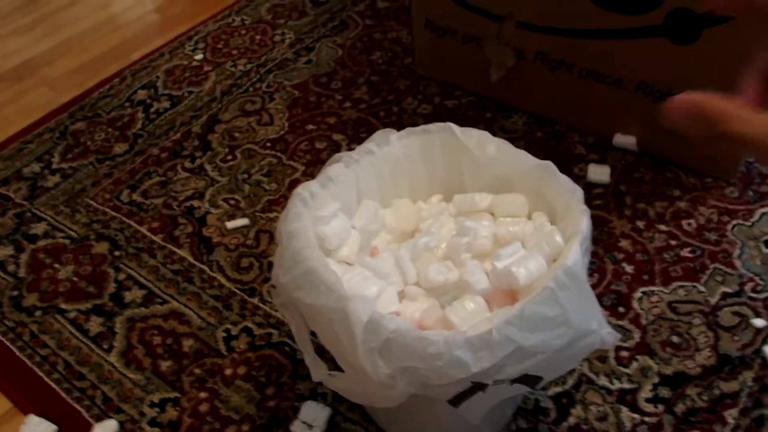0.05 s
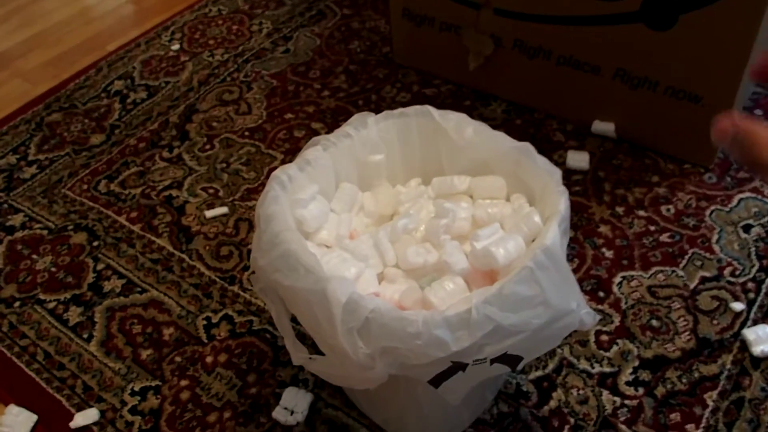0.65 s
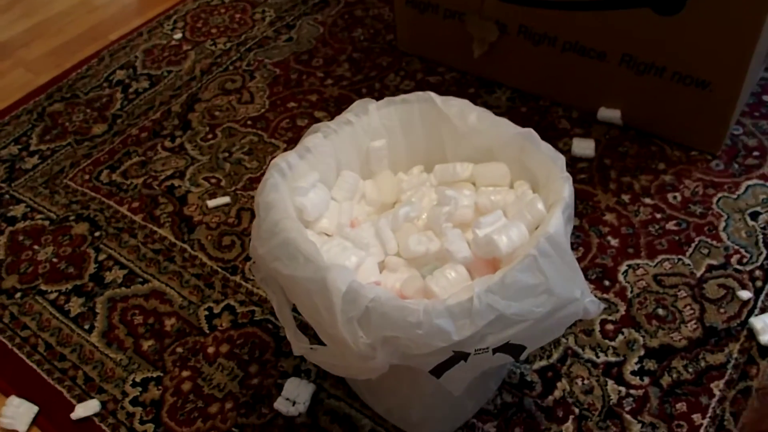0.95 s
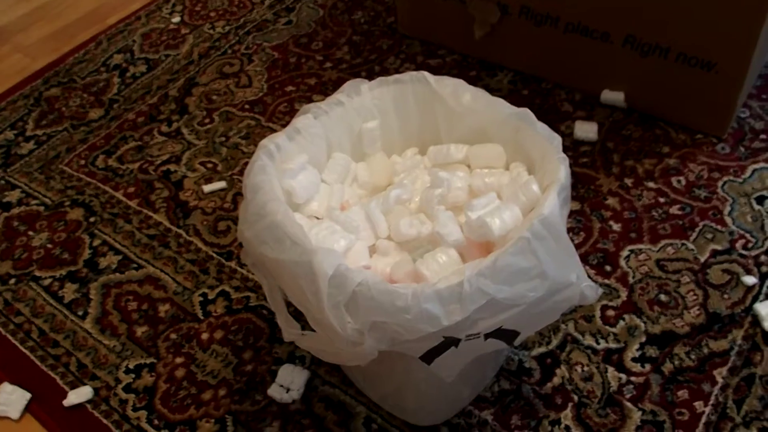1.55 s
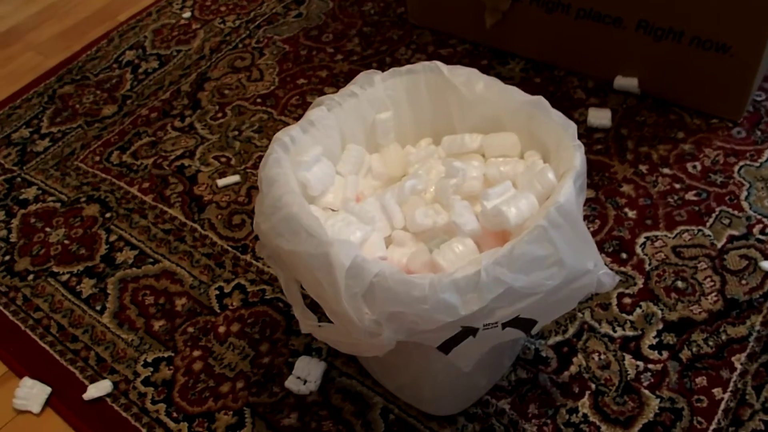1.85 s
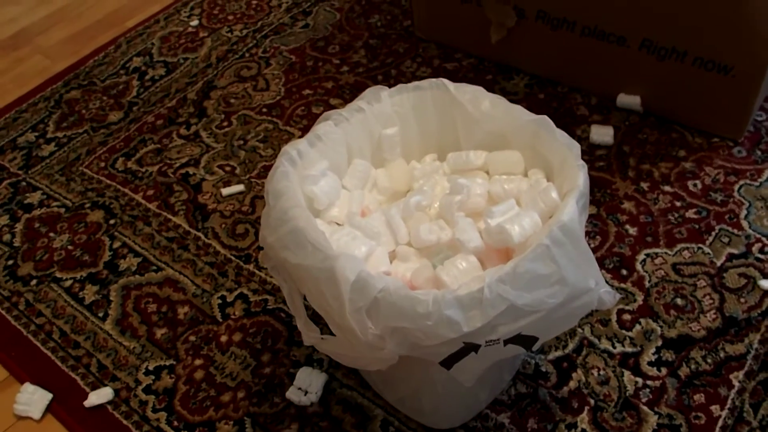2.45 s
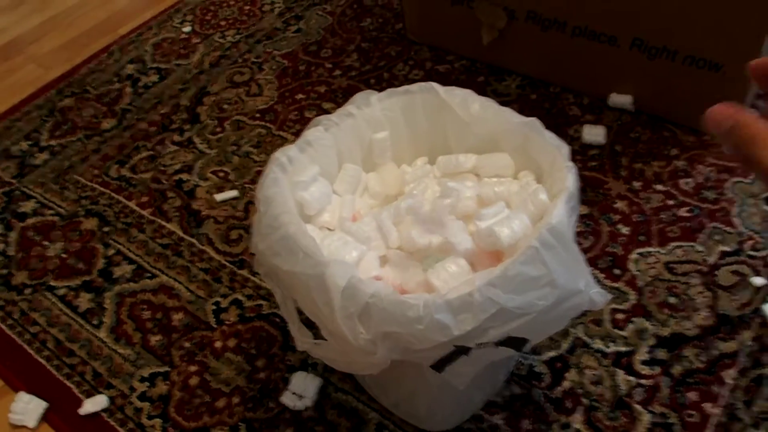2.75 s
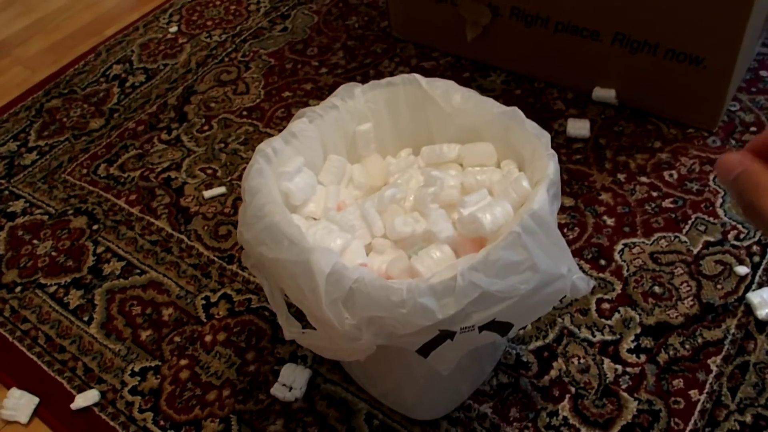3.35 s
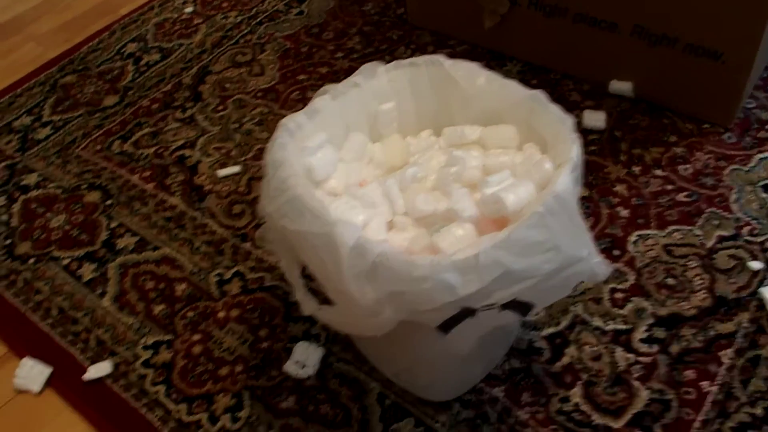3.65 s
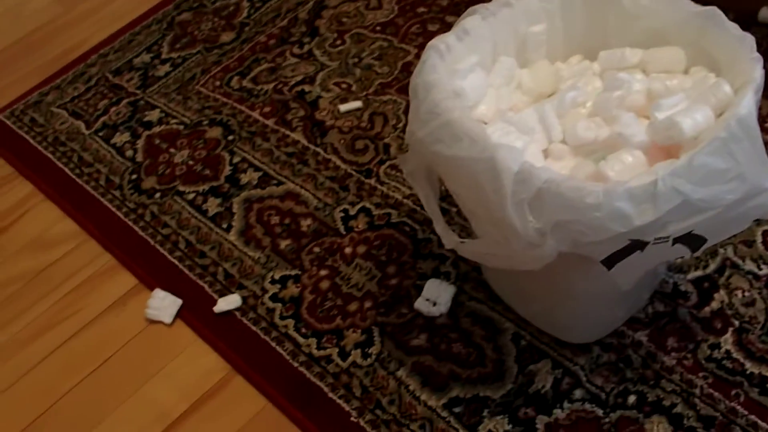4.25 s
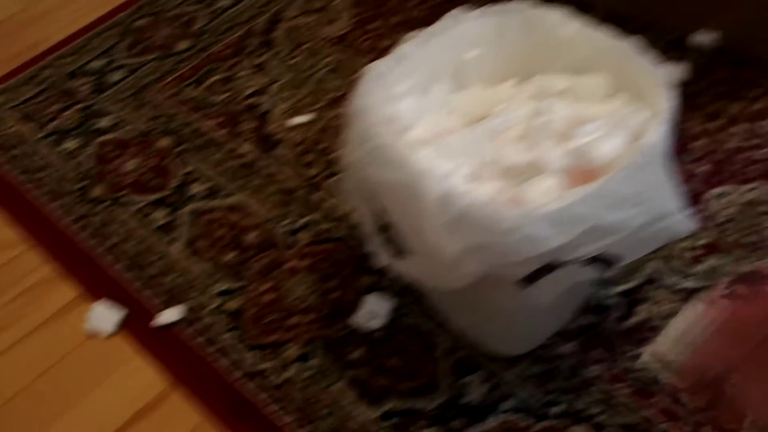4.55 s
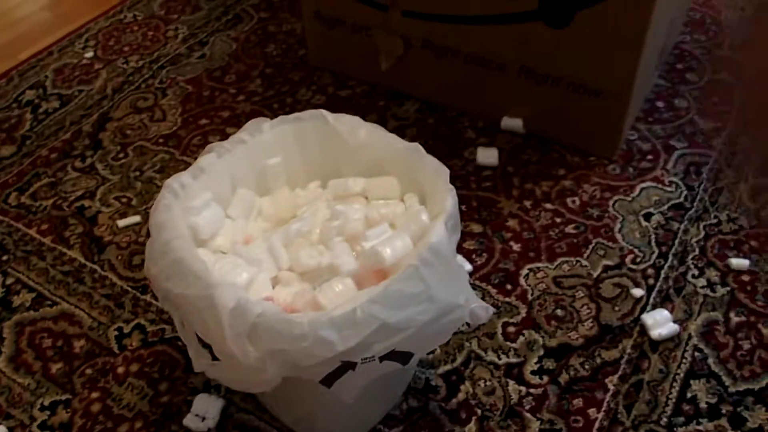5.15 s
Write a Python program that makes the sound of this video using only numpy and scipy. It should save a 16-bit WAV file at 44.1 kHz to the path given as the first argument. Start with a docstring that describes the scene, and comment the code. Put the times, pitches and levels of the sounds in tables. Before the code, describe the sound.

A low, gently pulsing compressor hum and soft room air run throughout. Close to the microphone, thin plastic gives a few sharp ticks between 0.2 and 0.6 seconds. Faint stirring begins around 1.2 seconds and grows into short, hollow scrapes at 1.6. From 1.7 to 2.4 seconds a hand briskly rustles foam packing peanuts and a plastic bin liner, hissy and crackling, with snaps and a tiny squeak near 1.9. A faint, soft bump follows at 2.5. At about 3.3 seconds a small hard object clinks brightly and bounces quickly, the loudest moment. Rustling resumes at 4 seconds, moving from left to right, with a sharp snap near 4.55. High, stuttering squeaks of foam on foam come between 4.7 and 5 seconds, followed by a last light rustle.

```python
"""A hand rubs and rustles foam and plastic close to the camera, in two bouts, beside a bin of foam
packing peanuts in a carpeted room. Stick-slip friction drives resonances that hiss, rasp and squeak,
while the film crackles and its creases snap. Between the bouts a small hard object clinks and bounces,
each impact exciting its damped modes. Behind it all, over the noise of the room air, a compressor
drones and beats slowly against the mains hum."""
import sys
import numpy as np
from scipy import signal
from scipy.fft import rfft, irfft, next_fast_len
from scipy.io import wavfile
from scipy.ndimage import map_coordinates

SR = 44100
rng = np.random.default_rng(int(sys.argv[2]) if len(sys.argv) > 2 else 0)


def to_wav(s):
    """Save 16-bit WAV."""
    ch = np.atleast_2d(s).T  # columns
    pcm = np.round(np.clip(ch, -1, 1) * 32767)  # PCM
    wavfile.write(sys.argv[1], SR, pcm.astype(np.int16))


N = 229486
TIME = np.arange(N) / SR


def amp(db):
    """Amplitude ratio of a level in decibels."""
    return 10 ** (np.asarray(db) / 20)


def unit(x):
    """Normalisation to rms 1."""
    return x / np.sqrt(np.mean(x ** 2) + 1e-20)


def along(points, hz):
    """Interpolation of (frequency, value) points on a logarithmic frequency axis."""
    f, v = np.transpose(points)
    return np.interp(np.log(hz + 1), np.log(f + 1), v)


def wobble(t, rate):
    """Smooth random modulation with rate knots a second."""
    knots = rng.standard_normal(int(len(t) * rate / SR) + 4)
    return map_coordinates(knots, [t * rate], mode="mirror")


def add(track, s, sound):
    """Superposition of a sound on the track from s seconds on."""
    start = max(0, round(s * SR))
    part = sound[..., :max(0, N - start)]
    track[..., start:start + part.shape[-1]] += part


def filtered(x, response):
    """Linear filtering: the spectrum is multiplied by a frequency response."""
    size = next_fast_len(N + SR // 2)
    return irfft(rfft(x, size) * response(np.fft.rfftfreq(size, 1 / SR)), size)[..., :N]


def coloured(x, spectrum, size=1024):
    """Minimum-phase filtering with unit energy and the given spectral shape."""
    hz = np.fft.rfftfreq(size, 1 / SR)
    skirt = np.minimum(1, (hz + 1) / spectrum[0][0]) ** 2
    cepstrum = irfft(np.log(amp(along(spectrum, hz)) * skirt + 1e-6))
    causal_fold = np.r_[1, np.full(size // 2 - 1, 2), np.zeros(size // 2)]
    pulse = irfft(np.exp(rfft(cepstrum * causal_fold)))
    return signal.oaconvolve(x, pulse[None] / np.linalg.norm(pulse), axes=1)[:, :x.shape[1]]


def resonance(x, centre_hz, octaves, steep=3.1):
    """Band-pass resonance; octaves is its half-width at half power."""
    hz = np.geomspace(400, 17000, num=80)
    gain_db = -10 * np.log10(1 + np.abs(np.log2(hz / centre_hz) / octaves) ** steep)
    return coloured(x, np.column_stack([hz, gain_db]))


def sliding_resonance(x, pitch_hz, width_hz):
    """Heterodyne filtering: a narrow pass band follows a moving pitch."""
    carrier = np.exp(2j * np.pi * np.cumsum(pitch_hz) / SR)
    b, a = signal.butter(2, width_hz / 2, fs=SR)
    return np.sqrt(2 * SR / width_hz) * (signal.lfilter(b, a, x / carrier) * carrier).real


# Likeness of the room noise at the two microphone ports: (frequency [Hz], correlation [1])
COHERENCE = [(50, 0.41), (150, 0.66), (380, 0.46), (900, 0.039), (2400, 0.017), (15000, 0.02)]
def diffuse_noise(spectrum):
    """Diffuse field of rms 1: the two ports are partly coherent in the bass, hardly in the treble."""
    def mid_side(hz):
        angle = np.arccos(np.clip(along(COHERENCE, hz), -1, 1)) / 2
        return amp(along(spectrum, hz)) * [np.cos(angle), np.sin(angle)]
    mid, side = filtered(rng.standard_normal((2, N)), mid_side)
    return unit(np.array([mid + side, mid - side]))


# Low and high bands of the room air: (frequency [Hz], relative spectral level [dB])
AIR_RUMBLE = [(20, -52), (30, -39), (38, -11), (55, -3.5), (90, 1.5), (140, -3), (220, 1), (300, -4.5),
              (430, -8), (560, -15), (900, -28.5)]
AIR_HISS = [(300, 7), (520, -4), (750, 0.5), (880, 13.5), (980, 3), (1220, 7), (1500, 2), (1900, 0.5),
            (2020, 3.5), (2300, 1), (2450, -4.5), (4000, -6), (5800, -16), (8000, -15), (11000, -29),
            (15000, -40)]
def room_air():
    """Stationary ambient noise: a rumble under a faint hiss."""
    return amp(-50) * diffuse_noise(AIR_RUMBLE) + amp(-52.5) * diffuse_noise(AIR_HISS)


# Compressor harmonics: (multiple of the shaft speed [1], level [dB])
SHAFT_ORDERS = [(1, -65.5), (2, -70), (3, -49), (4, -63), (5, -57.5), (11, -66.5)]
# Sidebands that the motor's load puts on its hum: (offset above the hum [shaft speeds], level [dB])
LOAD_SIDEBANDS = [(1, -88), (2, -63.5)]
def compressor(hum_hz=120, shaft_hz=40.31, in_step_s=0.226):
    """Beating: the third shaft order lies just above the mains hum, so they swell about once a second."""
    t = TIME - in_step_s
    mains = 2 * np.pi * hum_hz * t
    shaft = 2 * np.pi * shaft_hz * t + 0.063 * wobble(TIME, 4.27)
    tones = amp(-47) * np.cos(mains) + sum(amp(db) * np.cos(k * shaft) for k, db in SHAFT_ORDERS)
    tones -= sum(amp(db) * np.cos(mains + k * shaft) for k, db in LOAD_SIDEBANDS)
    whine = amp(-79) * np.sin(2 * np.pi * 7559 * TIME)  # a thin electronic tone
    return np.sqrt(2) * (tones + whine) * amp([[-0.3], [0.3]])


# Reverberation time of the room: (frequency [Hz], T60 [s])
ROOM_T60 = [(300, 0.9), (2500, 0.38), (8000, 0.29), (15000, 0.3)]
def reverberation(x):
    """Wall reflections form an exponentially decaying tail whose treble dies first."""
    hz, t, noise = signal.stft(rng.standard_normal((2, SR // 2)), SR, nperseg=256)
    decay = amp(-60 * t / along(ROOM_T60, hz)[:, None])
    tail = signal.istft(noise * decay, SR, nperseg=256)[1]
    tail = np.pad(unit(tail) / np.sqrt(tail.shape[1]), ((0, 0), (SR // 250, 0)))  # 4 ms late
    return signal.fftconvolve(x, tail, axes=1)[:, :N]


# A soft low bump: (frequency [Hz], relative spectral level [dB])
BUMP_SPECTRUM = [(150, -29), (300, 3), (480, 0), (700, -10), (1500, -40), (4000, -80)]
def bump(at_s=2.49, width_s=0.045, db=-52):
    """Low noise under a Gaussian envelope: a soft bump as the hand passes the camera."""
    return amp(db) * np.exp(-((TIME - at_s) / width_s) ** 2) * diffuse_noise(BUMP_SPECTRUM)


# Modes of the small object: (frequency [Hz], relative level [dB], T60 [s])
OBJECT_MODES = [(1263, -0.5, .045), (2450, -5, 0.13), (2917, -10, 0.12), (4156, -6, 0.13),
                (4970, -26, 0.07), (6540, -12, 0.095), (7000, -19, .1), (7962, -19, .1), (8750, -5, .08)]
# Its impacts: (time [s], level [dB], centre [Hz], half-width [octaves], relative crack level [dB])
IMPACTS = [(3.321, -18, 2170, 0.26, -12), (3.3391, -25, 4360, 0.7, -3.5), (3.3495, -40, 6800, 0.44, -4),
           (3.397, -41, 2500, 0.65, -10), (3.431, -40, 7000, 0.16, -13), (3.444, -23, 2810, 0.18, -6.5),
           (3.4454, -22, 4800, 0.13, -18)]
def clinks(clack_t60=0.04, crack_t60=0.0089, ring_db=-24, linewidth_hz=45):
    """Modal vibration: an impact excites modes near its centre, as a clack and a faint, unsteady ring."""
    out, t = np.zeros((2, N)), np.arange(SR // 3) / SR
    hz, mode_db, t60 = np.transpose(OBJECT_MODES)[..., None]
    decay = amp(-60 * t / clack_t60) + amp(ring_db - 60 * t / t60)
    crack_spectrum = [(700, -21), (1200, 5.5), (5000, 5.5), (7000, 2),
                      (9800, 8), (11500, -22), (16000, -4)]
    for s, db, centre_hz, octaves, crack_db in IMPACTS:
        excitation = 1 / (1 + (np.log2(hz / centre_hz) / octaves) ** 2)
        walk = np.cumsum(rng.standard_normal((len(hz), len(t))), axis=1)
        drift = np.sqrt(2 * np.pi * linewidth_hz / SR) * walk  # phase diffusion broadens each line
        phase = rng.normal(0, 0.53, (2, len(hz), 1)) + drift
        ring = np.sum(excitation * amp(mode_db) * decay * np.sin(2 * np.pi * hz * t + phase), axis=1)
        burst = amp(-60 * t / crack_t60) * rng.standard_normal((2, len(t)))
        blow = amp(-10) * resonance(burst, centre_hz, octaves, steep=6.1)
        crack = amp(crack_db) * coloured(burst, crack_spectrum)
        add(out, s, amp(db) * (ring + blow + crack))
    return out * amp([[2], [-2]])


# Snaps of the plastic: (time [s], level [dB])
SNAP_EVENTS = [(0.2337, -31), (0.2385, -34.5), (0.4325, -42.5), (0.4585, -41.5), (0.559, -41), (0.565, -46),
               (1.278, -51), (1.315, -54), (1.516, -42), (1.753, -29), (2.0225, -41), (2.143, -41),
               (2.165, -31), (2.232, -32.5), (2.3992, -31.5), (2.409, -34), (2.626, -35.5), (3.967, -43.5),
               (4.394, -31), (4.553, -36), (4.5576, -23.5), (4.622, -42), (4.828, -50)]
# Colour of a snap: (frequency [Hz], relative spectral level [dB])
SNAP_SPECTRUM = [(500, -5), (1500, -1.5), (3100, -2), (4100, 6), (5600, -5), (8500, 6), (11000, 5.5),
                 (15000, -6)]
def snaps(t60=0.016, gain_db=-4):
    """Buckling: a crease gives way with a very short crack, then a second, weaker one."""
    out, t = np.zeros((2, N)), np.arange(SR // 20) / SR
    for s, db in SNAP_EVENTS:
        for delay_s, drop_db in [(0, 0), (0.0021, -2)]:
            crack = unit(rng.standard_normal(len(t)) + 0.5 * rng.standard_normal((2, len(t))))
            add(out, s + delay_s, amp(db + gain_db + drop_db - 60 * t / t60) * crack)
    return coloured(out, SNAP_SPECTRUM)


# Path of the hand: (time [s], treble level of left over right [dB])
HAND_PATH = [(1.7, 2), (1.83, 0), (2.02, -5), (2.22, -5), (2.4, 1), (4.05, 9), (4.39, 3), (4.56, -7),
             (4.71, -8.5), (5.04, -3.5), (5.1, 5)]
# Shadow of the camera body: (frequency [Hz], share of that level difference [1])
SHADOW = [(3000, 0.16), (6800, 0.2), (8500, 0.99), (11000, 0.8), (14000, 0.24)]
def from_hand(pair, s):
    """Acoustic shadow and path difference: the ports differ in level and delay with the hand's place."""
    hz = np.fft.rfftfreq(pair.shape[1], 1 / SR)
    sides = np.array([[1], [-1]])
    pan_db = np.interp(s, *np.transpose(HAND_PATH))
    gain = amp(along(SHADOW, hz) * sides * pan_db / 2)
    gain /= np.sqrt(np.mean(gain ** 2, axis=0))
    left_lag_s = (0.09 - 0.0025 * pan_db) / 1000
    delay = np.exp(-1j * np.pi * hz * left_lag_s * sides)
    return irfft(rfft(pair) * gain * delay, pair.shape[1])


def slips(t, rate, spread):
    """Stick-slip excitation of rms 1: tiny random releases plus their diffuse stereo scatter."""
    released = rng.random(len(t)) < rate / SR
    ticks = unit(released * rng.standard_normal(len(t)))
    return unit(ticks + spread * rng.standard_normal((2, len(t))))


def crackle(t, cracks_per_s=520):
    """A Poisson process of rms 1: tiny cracks of uneven size in the film."""
    return unit((rng.random(len(t)) < cracks_per_s / SR) * rng.uniform(-1, 1, len(t)))


def catching(t, rate, depth_db):
    """Amplitude modulation of rms 1: the surface catches and lets go at an uneven rate."""
    cycles = np.cumsum(rate * 2 ** (0.5 * wobble(t, rate))) / SR + rng.random()
    return unit(amp(depth_db * np.cos(2 * np.pi * cycles)))


HISS_HZ = 8460
# Fine crackle of the film: (frequency [Hz], relative spectral level [dB])
FIZZ_SPECTRUM = [(700, -16.5), (2000, -9), (5000, 0), (9000, 0), (12500, 3), (15400, -3), (16500, -13)]
def rubbing(strokes, attack_s, slip_rate, flutter_db, hiss_octaves, overtone_db, body_db,
            rasp_bandwidth=0.26, octaves_per_s=0, crackle_db=1, catch_rate=400, release_t60=0.086):
    """Source and filter: slips drive a bright hiss, a thin whistle, a hollow rasp and a fine fizz."""
    out, t = np.zeros((2, N)), np.arange(SR // 5) / SR
    for s, length, db, rasp_hz, rasp_db, whistle_hz, whistle_db, fizz_db in strokes:
        rise_s = min(attack_s, 0.37 * length)
        swell_db = -17 * np.maximum(0, 1 - t / rise_s) ** 2
        release_db = -60 * np.maximum(0, t - length) / release_t60
        force = amp(db + swell_db + release_db) * catching(t, catch_rate, flutter_db)
        drive = lambda: force * slips(t, slip_rate, spread=0.91)
        waver = 2 ** (0.04 * wobble(t, 120))  # the resonances waver as the grip shifts
        pitch_hz = rasp_hz * waver * 2 ** (octaves_per_s * (np.minimum(t, length) - length / 2))
        width_hz = rasp_bandwidth * rasp_hz
        hiss = amp(-4) * resonance(drive(), HISS_HZ, hiss_octaves, steep=7.8)
        whistle = amp(whistle_db) * sliding_resonance(drive(), whistle_hz * waver, width_hz=650)
        rasp = sliding_resonance(drive(), pitch_hz, width_hz)
        rasp += amp(overtone_db) * sliding_resonance(drive(), 2 * pitch_hz, width_hz)
        body = amp(body_db) * resonance(drive(), rasp_hz, octaves=1, steep=8.9)
        film = slips(t, slip_rate, spread=8.2) + amp(crackle_db) * crackle(t)
        fizz = amp(fizz_db) * coloured(force * film, FIZZ_SPECTRUM)
        add(out, s, from_hand(hiss + whistle + amp(rasp_db) * (rasp + body) + fizz, s))
    return out


# Faint stirring of the hand: (start [s], end [s], level [dB])
STIR_SPANS = [(1.201, 1.31, -55.5), (1.512, 1.64, -52), (2.298, 2.37, -56), (4.097, 4.16, -50.5),
              (4.45, 4.51, -56.5), (4.6, 4.66, -51.5), (4.919, 4.97, -49), (5.111, 5.2, -63)]
def stirring(strokes_per_s=28, scatter_db=2, rasp_db=-9, whistle_db=-13, fizz_db=-6):
    """Light friction: faint strokes of random pitch overlap into a continuous rustle."""
    strokes, length = [], 1 / strokes_per_s
    for start, end, db in STIR_SPANS:
        for s in np.arange(start, end, length):
            late, strength, pitch = rng.standard_normal(3)
            rasp_hz, whistle_hz = 3300 * 2 ** (0.3 * pitch), HISS_HZ * 2 ** (0.1 * pitch)
            strokes.append((s + 0.25 * late * length, length, db + scatter_db * strength,
                            rasp_hz, rasp_db, whistle_hz, whistle_db, fizz_db))
    return rubbing(strokes, attack_s=0.0025, slip_rate=660, flutter_db=0, hiss_octaves=0.4,
                   overtone_db=-16, body_db=-5)


# Slow, hollow scrapes: (time [s], duration [s], level [dB], rasp [Hz], relative rasp level [dB],
# whistle [Hz], relative whistle level [dB], relative fizz level [dB])
SCRAPE_STROKES = [(0, 0.0055, -42, 2970, -0.5, 8800, -6, -7),
                  (1.56, 0.022, -48.5, 2400, 1.5, 8800, -5.5, -4),
                  (1.644, 0.034, -44, 2550, -0.5, 8200, -13, -2),
                  (1.684, 0.022, -37.5, 2150, -0.5, 9100, -5, 0.5),
                  (1.709, 0.023, -40.5, 1670, -16, 9200, -1, -1)]
def scrapes():
    """Slow sliding friction: the hollow rasp resonance stands out and sinks in pitch."""
    return rubbing(SCRAPE_STROKES, attack_s=0.022, slip_rate=1500, flutter_db=1, hiss_octaves=0.22,
                   overtone_db=-14, body_db=-3, octaves_per_s=-1.3)


# A swooping squeak inside the long rustle: (time [s], slip rate [Hz])
CHIRP_RATE = [(1.886, 1650), (1.894, 1330), (1.901, 1160), (1.907, 1300), (1.913, 1750)]
def chirp(db=-41):
    """Periodic stick-slip: the slips lock into a harmonic train whose rate dips and climbs again."""
    times, rates = np.transpose(CHIRP_RATE)
    t = np.arange(times[0], times[-1], 1 / SR)
    phase = 2 * np.pi * np.cumsum(np.interp(t, times, rates)) / SR
    train = unit(sum(np.cos(k * phase) for k in range(3, 10)))
    out = np.zeros((2, N))
    add(out, times[0], amp(db) * train * signal.windows.tukey(len(t), 0.5))
    return resonance(out, HISS_HZ, octaves=0.27)


# Squeaks of foam on foam: columns as in SCRAPE_STROKES
SQUEAK_STROKES = [(4.048, 0.04, -44.5, 3900, -28, 7870, 3, -6.5),
                  (4.672, 0.066, -41, 3070, -18, 8200, -6, -11.5),
                  (4.717, 0.014, -31, 3080, -19, 8500, -5, -24),
                  (4.728, 0.035, -29, 3750, -24, 8340, -11, -20),
                  (4.766, 0.011, -39, 4400, -12, 8500, -13, -16),
                  (4.892, 0.01, -37, 4230, -17, 8830, -9, -13),
                  (4.967, 0.043, -27, 3680, -15, 7120, -10, -24)]
def squeaks():
    """Coarse stick-slip: foam catching on foam makes a narrow, stuttering hiss and a rising rasp."""
    return rubbing(SQUEAK_STROKES, attack_s=0.018, slip_rate=3000, flutter_db=4.5, hiss_octaves=0.27,
                   overtone_db=-12, body_db=-27, octaves_per_s=4.3, crackle_db=4.5, catch_rate=220)


# Brisk rustles of foam and film: columns as in SCRAPE_STROKES
RUSTLE_STROKES = [(1.732, 0.033, -35, 3320, -17, 7850, -7, -4),
                  (1.827, 0.1, -34.5, 5000, -8, 9600, -4.5, -4),
                  (1.932, 0.051, -40, 4500, -7, 9400, -18, -2),
                  (2.013, 0.035, -34, 4750, -24, 9350, 1, -3.5),
                  (2.054, 0.05, -36.5, 3700, -11, 8600, -8, -3.5),
                  (2.162, 0.018, -30, 3550, -18, 8860, -4, -6.5),
                  (2.228, 0.024, -37, 2720, -14.5, 9360, -6.5, -7),
                  (2.39, 0.015, -44, 4430, -9, 8600, -10, -2),
                  (3.982, 0.023, -43.5, 4070, -15, 8700, -6.5, -5.5),
                  (4.148, 0.02, -42, 3350, -8, 8500, 0, -8),
                  (4.165, 0.03, -32.5, 3400, -9.5, 8710, -3.5, -7),
                  (4.168, 0.015, -35, 4850, -4, 6740, -3, -12),
                  (4.293, 0.032, -35, 2320, -11.5, 8900, -12, -3.5),
                  (4.36, 0.0082, -43, 4400, -10, 7960, -5, -7),
                  (4.388, 0.031, -32, 5250, -6, 7700, -5, -5.5),
                  (4.51, 0.012, -39.5, 4600, -6, 8160, -10, -7),
                  (4.556, 0.025, -34.5, 3920, -10.5, 8770, -2.5, -5.5),
                  (5.042, 0.025, -38.5, 4260, -8.5, 7500, -14, -7.5),
                  (5.101, 0.0071, -44.5, 3530, -14, 8500, -15, -2)]
def rustles():
    """Fast sliding friction: dense slips merge into noise while the film crackles."""
    return rubbing(RUSTLE_STROKES, attack_s=0.011, slip_rate=6000, flutter_db=-0.5, hiss_octaves=0.28,
                   overtone_db=-4.5, body_db=-5.5, rasp_bandwidth=0.2)


def scene():
    """Direct and reverberant sound add over the room's drone; the squeaks are nearest and driest."""
    rustle = rustles() + stirring() + chirp()
    scrape, squeak, snap, clink = scrapes(), squeaks(), snaps(), clinks()
    echo = reverberation(amp(-7) * rustle + amp(-5.5) * scrape + amp(-13) * squeak
                         + amp(-3.5) * snap + amp(-4.5) * clink)
    background = room_air() + compressor()
    return background + echo + bump() + clink + snap + scrape + squeak + rustle


# Treble colour, with narrow dips near 6 and 11 kHz: (frequency [Hz], gain [dB])
TREBLE_COLOUR = [(5600, -0.5), (5950, -8), (6400, 1.5), (10200, -2.5), (11100, -11), (12300, -6)]
def record(dry, cutoff_hz=16100):
    """Linear filtering: two narrow dips colour the treble and a steep low-pass limits the band."""
    return filtered(dry, lambda hz: amp(along(TREBLE_COLOUR, hz)) / (1 + (hz / cutoff_hz) ** 160))


dry = scene()
out = record(dry)
to_wav(out)
```